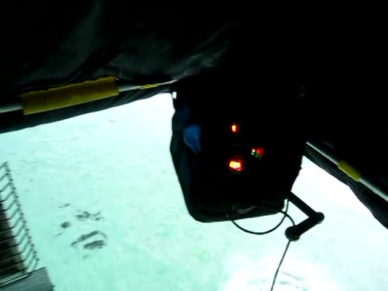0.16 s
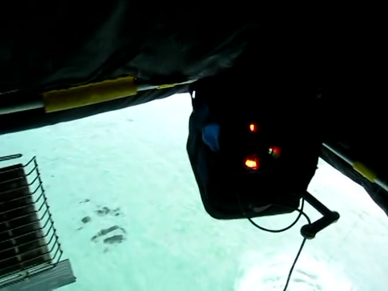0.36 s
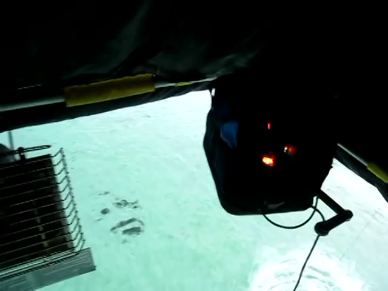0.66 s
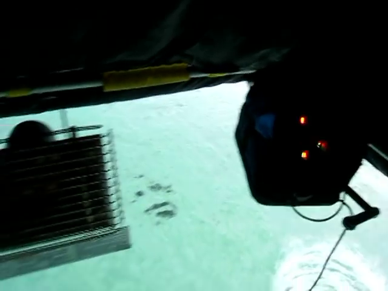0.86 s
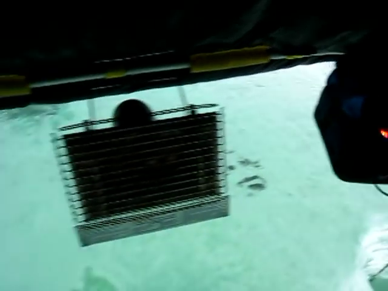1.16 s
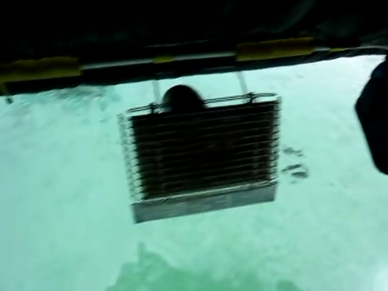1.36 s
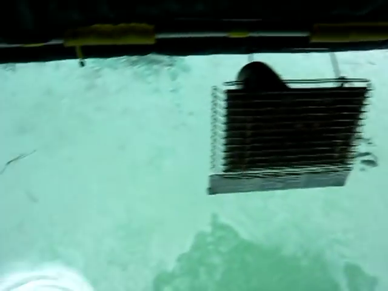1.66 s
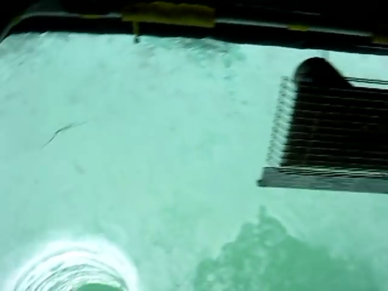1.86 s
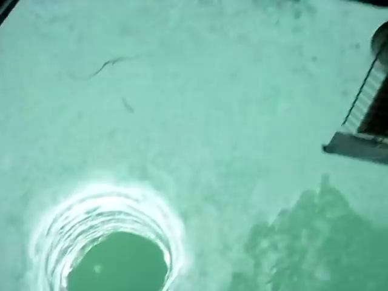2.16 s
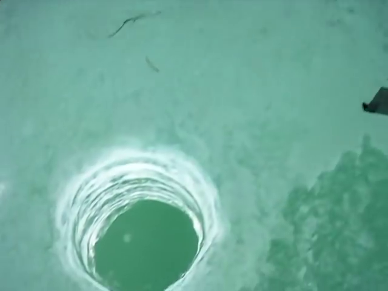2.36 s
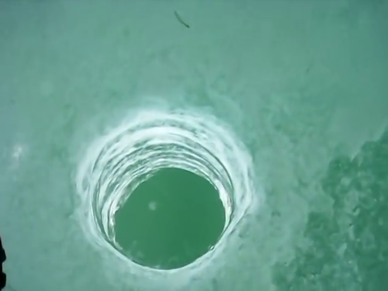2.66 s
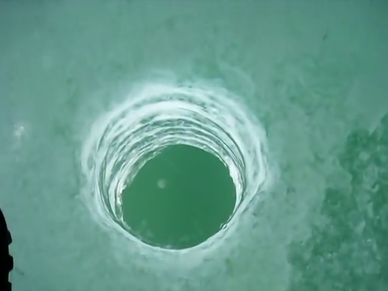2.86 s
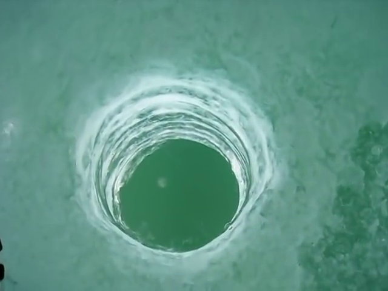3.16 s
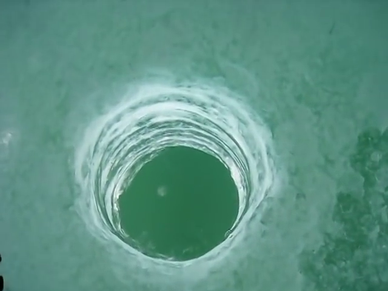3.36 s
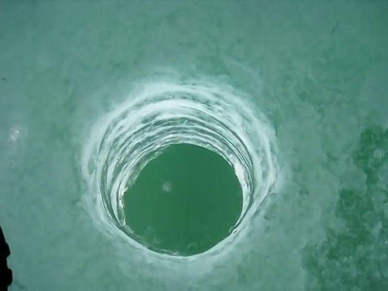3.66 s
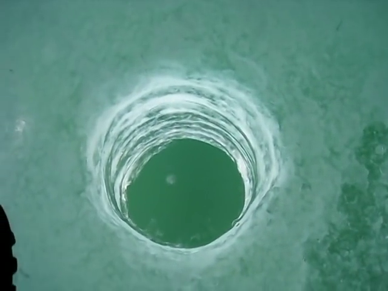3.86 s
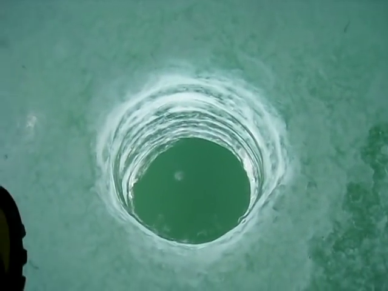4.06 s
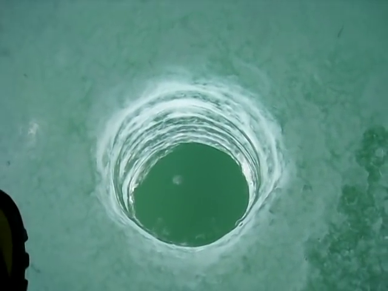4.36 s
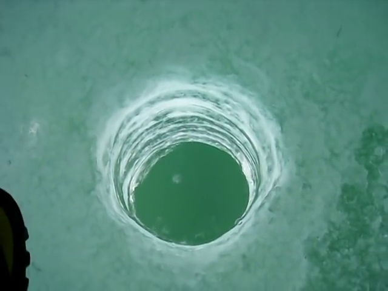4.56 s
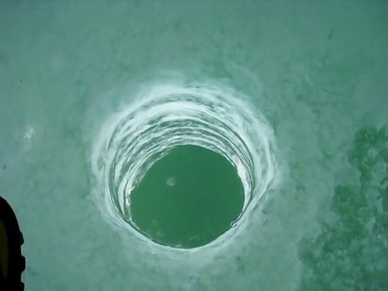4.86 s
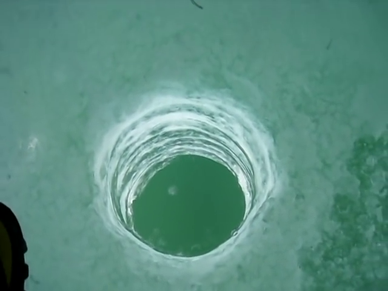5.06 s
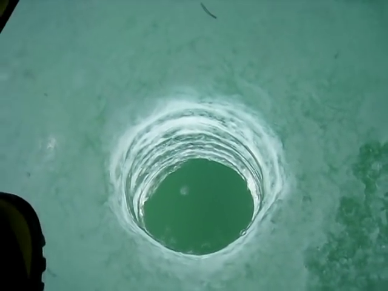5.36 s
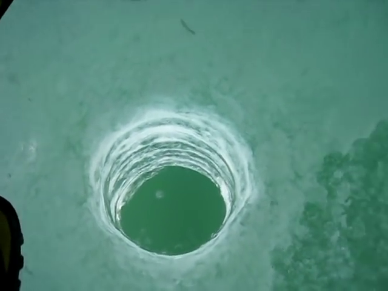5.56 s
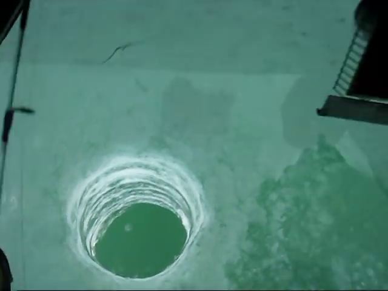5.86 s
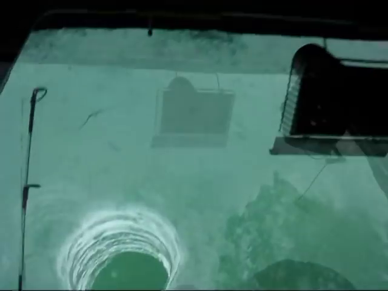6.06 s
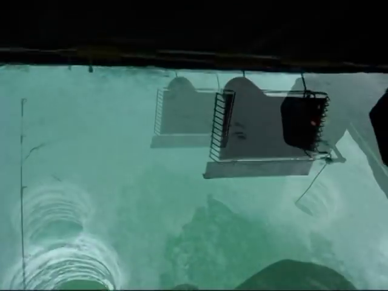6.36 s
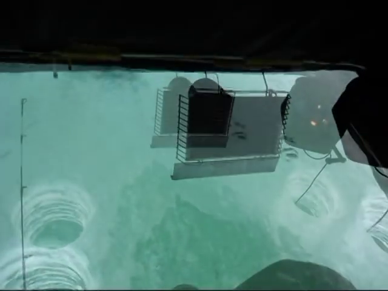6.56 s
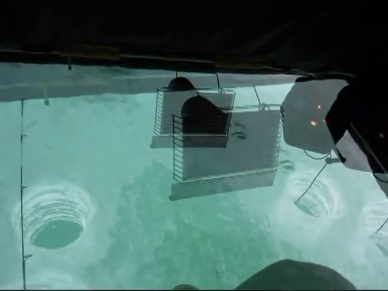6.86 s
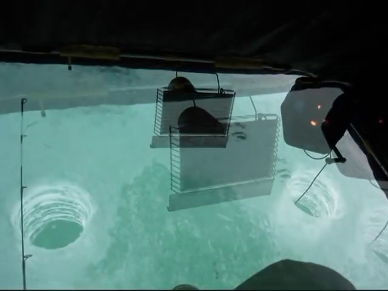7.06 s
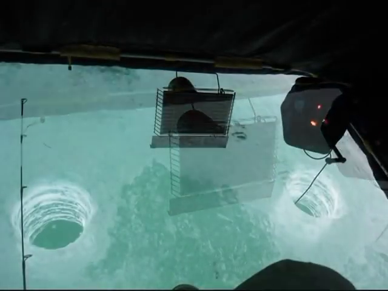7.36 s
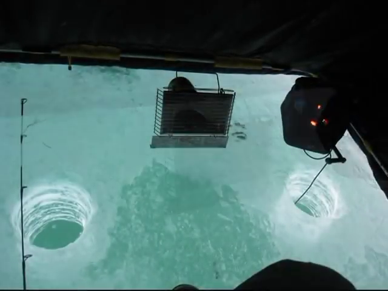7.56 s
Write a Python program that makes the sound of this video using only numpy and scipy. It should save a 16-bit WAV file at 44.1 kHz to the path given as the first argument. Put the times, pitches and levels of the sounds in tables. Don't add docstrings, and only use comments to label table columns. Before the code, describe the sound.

A propane heater hisses steadily with a thin high whistle inside a small tent, while sleeves rub close by and gear clicks, then smacks loudly once.

```python
import sys
import numpy as np
from scipy import signal
from scipy.fft import rfft, irfft, next_fast_len
from scipy.io import wavfile
from scipy.ndimage import uniform_filter1d, map_coordinates

SR = 44100
rng = np.random.default_rng(int(sys.argv[2]) if len(sys.argv) > 2 else 0)


def elevation(decibels):
    levels = np.asarray(decibels, float)
    return 10 ** (levels / 20)


def waveform_to_disk(signal):
    frames = np.transpose(np.atleast_2d(signal))
    scaled = np.clip(frames, -1, 1) * 32767
    samples = np.round(scaled).astype(np.int16)
    wavfile.write(sys.argv[1], SR, samples)


N = 340011


def unit(x):
    return x / np.sqrt(np.mean(x ** 2) + 1e-20)


def along(points, hz):
    f, v = np.transpose(points)
    return np.interp(np.log(hz + 1), np.log(f + 1), v, left=v[0] - 60, right=v[-1] - 60)


def curves(rows):
    s, *cols = np.transpose(rows)
    return [np.interp(np.arange(N) / SR, s, c) for c in cols]


def wobble(rate):
    step = np.arange(0, N + 16, 16)
    knots = rng.standard_normal(int(N * rate / SR) + 4)
    return np.interp(np.arange(N), step, map_coordinates(knots, [step * rate / SR]))


def patchy(depth_db):
    z = signal.stft(rng.standard_normal(N), nperseg=512)[2]
    field = uniform_filter1d(rng.standard_normal(z.shape), size=6, axis=0)
    field = uniform_filter1d(field, size=12, axis=1)
    return signal.istft(z * elevation(depth_db * unit(field)), nperseg=512)[1][:N]


def coloured(x, spectrum):
    m = next_fast_len(N + 8192)
    response = elevation(along(spectrum, np.fft.rfftfreq(m, 1 / SR)))
    return unit(irfft(rfft(x, m) * response, m)[:N])


def narrow(hz, width_hz):
    hz = np.full(N, hz) if np.isscalar(hz) else hz
    keep = np.exp(-1.55 * np.pi * width_hz / SR)
    whole_seconds = -(-len(hz) // SR) * SR
    noise = rng.standard_normal((2, whole_seconds))[:, :len(hz)]
    slow = signal.lfilter([1], [1, -2 * keep, keep ** 2], noise)
    turn = 2 * np.pi * np.cumsum(hz) / SR
    return unit(slow[0] * np.cos(turn) + slow[1] * np.sin(turn)) * np.sqrt(2)


def shelter(x):
    # hz, t60_s
    decay = [(300, 0.08), (2000, 0.21), (10000, 0.24)]
    hz, t, z = signal.stft(rng.standard_normal(SR // 4), SR, nperseg=256)
    f, t60 = np.transpose(decay)
    fall = elevation(-60 * t / np.interp(hz, f, t60)[:, None])
    tail = signal.istft(z * fall, SR, nperseg=256)[1]
    return signal.fftconvolve(np.pad(x, (220, 0)), tail / np.linalg.norm(tail))[:N]


def drifting_walls(x):
    hop = round(0.7 * SR)
    out, x = np.zeros(N + 6 * hop), np.pad(x, (hop, 2 * hop))
    window = np.sin(np.pi * np.arange(2 * hop) / (2 * hop))
    for a in range(0, N + hop, hop):
        tail = shelter(window * x[a:a + 2 * hop])
        out[a:a + len(tail)] += tail
    return out[hop:hop + N]


def flame():
    # time_s, rumble_db, throat_tone_db, low_tone_db
    burn = [
        (0, -55, -65.5, -64),
        (.9, -54, -61.5, -70),
        (1.2, -54, -69, -63.5),
        (1.8, -54, -71, -64),
        (3, -55, -73, -63.5),
        (4.2, -53, -73, -66.5),
        (5.7, -54.5, -73, -67),
        (6.5, -55, -71, -65.5),
        (7.3, -57, -68, -61),
        (7.71, -56, -70, -59.5),
    ]
    # hz, db_per_hz
    rumble_spectrum = [(21, -43.5), (36, -10), (49, -5.5), (75, -2.5), (97, 2), (166, -0.5), (199, -9),
                       (222, -6.5), (320, -12.5), (420, -47.5), (700, -120)]
    # hz, db_per_hz
    roar_spectrum = [(180, -43), (260, -3.5), (400, -2), (550, 4.5), (800, 0), (1300, 0.5), (2500, -28.5),
                     (4000, -19)]
    # hz, width_hz, over_rumble_db
    hum = [(109.8, 10, -10), (89.8, 9.7, -10.5)]
    rumble_db, throat_db, low_db = curves(burn)
    rumble = coloured(patchy(depth_db=0.7), rumble_spectrum)
    rumble = rumble + sum(elevation(db) * narrow(hz, width) for hz, width, db in hum)
    roar = coloured(patchy(depth_db=1), roar_spectrum)
    throat = elevation(throat_db) * narrow(399, width_hz=120)
    low = elevation(low_db) * narrow(195.5, width_hz=17)
    roar_db = -54 + 0.99 * wobble(3.04)
    return elevation(rumble_db + .6 * wobble(6.4)) * rumble + throat + low + elevation(roar_db) * roar


def cloth():
    # middle_s, length_s, rub_db, swish_over_rub_db
    strokes = [(0.086, 0.038, -57, 3.5), (0.226, 0.102, -45.5, 5), (0.268, 0.033, -35, -11),
               (0.317, 0.034, -33, -6), (.342, 0.018, -33.5, -6), (.367, .018, -34, -5),
               (0.393, .022, -35, -5), (.66, 0.059, -41.5, -6.5), (.72, 0.063, -42, 1.5),
               (0.798, 0.14, -43, -6), (.8, 2.3, -47, -7), (0.905, 0.1, -40.5, 2.5), (1.164, 0.059, -39, 0),
               (1.26, 0.15, -41, -10), (1.43, 0.15, -41.5, -13), (1.96, 0.24, -48.5, 1),
               (2.186, 0.16, -44, -6), (2.45, 0.42, -51.5, 5), (2.885, 0.07, -38.5, 2), (2.951, .1, -38, 2),
               (3.037, 0.12, -37.5, 6), (3.15, 0.18, -37.5, 6), (3.284, 0.25, -37.5, 6),
               (3.43, 0.16, -42, 4), (3.626, 0.27, -41, 4.5), (3.77, 0.21, -40.5, 3), (3.87, .12, -49, 0),
               (4.39, .1, -46, -17), (4.8, 0.16, -44, -5), (5.632, 0.2, -41, -4.5),
               (5.784, 0.17, -38.5, -4), (5.947, 0.25, -32.5, -3.5), (6.116, 0.25, -41.5, 1.5),
               (6.302, 0.27, -40, -1), (6.469, 0.17, -36, -3.5), (7.206, 0.18, -41.5, 0.5)]
    # hz, db_per_hz
    rub_spectrum = [(300, -35.5), (550, -21.5), (800, -5), (1050, -4.5), (2000, -0.5), (3000, -2.5),
                    (4500, -3), (7000, -18)]
    # hz, db_per_hz
    swish_spectrum = [(2500, -18.5), (4000, -8), (6000, -4), (8500, -3), (11000, -3), (13500, -9.5),
                      (15700, -16.5), (16500, -39)]
    # hz, db_per_hz
    thrum_spectrum = [(200, -23), (300, -5.5), (450, -1.5), (900, -2.5), (2000, -3), (2500, -16),
                      (3500, -39)]
    square = 1.68
    rest_rub_db, rest_swish_db = -50, -49
    t = np.arange(0, N + 64, 64) / SR
    middle, length, rub_db, swish_db = np.transpose(strokes)[:, :, None]
    power = elevation(2 * rub_db - 8.7 * np.minimum(abs(2 * (t - middle) / length), 9) ** square)

    def gain(over_rub_db, rest_db):
        total = (power * elevation(2 * over_rub_db)).sum(axis=0) + elevation(2 * rest_db)
        return np.interp(np.arange(N) / SR, t, np.sqrt(total))

    def grains(rough_db):
        return patchy(depth_db=1.5) * elevation(rough_db * wobble(500) + wobble(25))

    rub = coloured(grains(rough_db=1.5), rub_spectrum)
    swish = coloured(grains(rough_db=1.0), swish_spectrum)
    thrum = coloured(rng.standard_normal(N) * elevation(2.5 * wobble(120)), thrum_spectrum)
    moving = gain(-12.5 - 0.53 * swish_db, -90) * thrum
    moving = moving + gain(0.1 * swish_db, rest_rub_db) * rub
    return moving + elevation(5.0) * gain(swish_db, rest_swish_db) * swish


def blows():
    # start_s, peak_db, pitch_hz, after_ring_db
    thuds = [
        (4.35, -28, 640, -11),
        (4.353, -35, 373, -12),
        (5.6155, -24, 479, -24),
        (5.68, -32, 230, -20),
        (5.268, -26, 720, -20),
        (5.83, -26, 710, -15),
        (5.889, -24.5, 523, -22),
        (6.035, -29, 690, -26),
    ]
    clicks = [(0.361, -23, 1300, -12), (0.366, -22, 2050, -4), (0.403, -22, 1800, -18),
              (3.7584, -23, 1100, -10), (4.7411, -27, 1270, -17), (0.249, -18.5, 1140, -15),
              (5.2655, -18, 1400, -19.5), (5.2658, -19, 3000, -20), (5.2658, -20, 4600, -19.5),
              (5.2792, -21, 2000, -8), (5.279, -13, 5000, -22), (5.886, -12.5, 1620, -19),
              (6.0353, -12, 1300, -22), (6.479, -19.5, 1348, -30), (6.4925, -24, 795, -22)]
    pops = [(0.2593, -22, 1590, -20), (0.2615, -20, 2200, -20), (0.3132, -24, 2060, -12),
            (0.317, -24, 2100, -19), (0.393, -24, 1930, -12), (0.3394, -25, 1610, -6),
            (0.382, -22, 1300, -9), (0.6963, -20, 2060, -20), (1.3673, -26.5, 1050, -10),
            (3.753, -13, 3420, -13), (5.0469, -37.5, 1576, -10), (6.4842, -13, 2044, -18)]
    ticks = [
        (0.6961, -31.5, 2010, 7),
        (1.8081, -33.5, 2450, -3.5),
        (2.2184, -35, 1900, -9),
        (4.277, -28, 2000, -2),
        (4.2795, -25, 1800, -4),
        (4.478, -32, 2050, 0),
        (6.7316, -23, 2430, -10),
        (7.4175, -17.5, 2170, -10),
    ]
    tocks = [
        (4.2807, -36, 1414, 2),
        (4.349, -32, 810, -15),
        (4.349, -35, 1510, -12),
        (4.481, -36, 1300, -3),
        (6.7322, -25, 1313, -21),
        (7.4192, -19, 1390, -33),
    ]
    knocks = [(0.357, -38.5, 297, -21), (0.361, -30, 877, -14), (1.245, -33, 853, -12),
              (1.389, -40, 611, -4), (3.239, -40, 500, 0), (4.365, -40, 175.7, -10),
              (5.2785, -17.5, 720, -14), (5.291, -33, 642, -14), (5.68, -43, 89.4, -9.5),
              (5.681, -27, 690, -6), (5.8, -40, 697, 2)]
    pings = [(1.9155, -21, 1960, -8), (1.917, -27, 3950, -9), (1.918, -30, 3350, -3), (1.92, -33, 2400, -1),
             (1.917, -33, 1680, -12), (1.932, -31, 1950, -12), (1.981, -37, 1930, -6),
             (1.988, -37, 1930, -9), (5.278, -28, 2100, -5), (5.281, -31, 2750, -5), (5.291, -34, 2550, -5),
             (5.288, -35, 2150, -5), (4.2755, -27, 1800, -5), (4.279, -31, 2250, -1),
             (4.278, -32, 3450, -4), (4.477, -32, 1800, -3), (4.48, -33, 2350, -1), (4.483, -34, 3400, -4)]
    smacks = [
        (5.6765, -20, 3300, -14),
        (5.6852, 1.5, 2020, -33),
        (5.6858, -15, 5600, -20),
        (5.6858, -19, 4300, -20),
        (5.6872, -21, 1150, -14),
        (5.6895, -19, 2480, -10),
        (5.6915, -20, 2550, -15),
    ]
    # blow_cycles, crack_db, ring_t60_s, noise_in_ring, fall_s
    click = (2.2, -7, 0.06, 1, .0005)
    thud = (2.5, -31, 0.2, 0.2, .0009)
    ping = (23, -18, .07, .35, 0)
    smack = (3.8, -12, .14, 1, .0004)
    pop, tick = (3.5, -7.5, 0.1, 0.75, .0009), (8, -13, 0.06, 1.1, .0004)
    tock, knock = (5, -27, .045, 2, .0006), (6, -33.5, 0.09, 0.4, .0002)
    kinds = [(thuds, thud), (clicks, click), (pops, pop), (ticks, tick),
             (tocks, tock), (knocks, knock), (pings, ping), (smacks, smack)]
    out, t = np.zeros(N + SR), np.arange(SR // 12) / SR
    bright = signal.butter(2, [2600, 7000], "band", fs=SR, output="sos")
    modes = [(1, 0.8), (1.25, .35), (1.85, 0.3)]
    events = [(row, kind) for rows, kind in kinds for row in rows]
    for (s, db, hz, ring_db), (cycles, crack_db, t60, noisy, fall_s) in events:
        length = cycles / hz
        push = np.sin(np.pi * np.clip(t / length, 0, 1)) ** 2
        fall = 1 + fall_s / length * (1 - t / length)
        blow = push * np.sin(2 * np.pi * hz * t * fall)
        crack = elevation(crack_db - 60 * t / 0.021) * signal.sosfilt(bright, rng.standard_normal(len(t)))
        body = signal.butter(2, [0.84 * hz, 1.27 * hz], "band", fs=SR, output="sos")
        rattle = noisy * unit(signal.sosfilt(body, rng.standard_normal(len(t))))
        rattle = rattle + sum(level * np.sin(2 * np.pi * hz * ratio * t) for ratio, level in modes)
        rattle = rattle * elevation(ring_db - 3.0 - 60 * t / t60)
        onset = 1 - np.exp(-t / 0.001)
        out[round((s + .0003) * SR):][:len(t)] += elevation(db - 3.5) * (blow + (crack + rattle) * onset)
    return out[:N]


def cracks():
    # start_s, peak_db
    events = [(0.2626, -23), (0.3135, -19), (.317, -23), (0.694, -19), (0.6985, -20), (1.918, -29),
              (.3405, -23), (.347, -24), (.3695, -23), (.3885, -24), (.396, -24), (3.7492, -17.5),
              (4.278, -30), (4.479, -30.5), (5.2649, -27), (5.279, -19.5), (5.885, -27.5), (6.035, -24),
              (6.4835, -23), (6.725, -30), (6.732, -27), (7.418, -26.5)]
    out, t = np.zeros(N + SR), np.arange(SR // 12) / SR
    broad = signal.butter(2, [900, 6500], "band", fs=SR, output="sos")
    for s, db in events:
        noise = signal.sosfilt(broad, rng.standard_normal(len(t)))
        out[round(s * SR):][:len(t)] += elevation(db + 2.0 - 60 * t / 0.025) * noise
    return out[:N]


def snaps():
    # start_s, peak_db, centre_hz
    events = [
        (0.0712, -21, 11200),
        (0.3117, -16, 10200),
        (1.1686, -21, 9630),
        (3.7515, -2, 9330),
        (3.7564, -12, 9170),
        (5.2653, -16, 4500),
        (5.2788, -15, 5000),
        (6.4845, -4, 12840),
        (6.7314, -13, 11600),
        (7.4177, -13.5, 8930),
    ]
    out, t = np.zeros(N + SR), np.arange(SR // 12) / SR
    sharp = signal.butter(4, 8000, "high", fs=SR, output="sos")
    for s, db, hz in events:
        fading = elevation(db - 60 * t / 0.0046) * (1 - np.exp(-t / 0.00028))
        noise = signal.sosfilt(sharp, rng.standard_normal(len(t)))
        out[round(s * SR):][:len(t)] += fading * (0.97 * noise + 0.52 * np.sin(2 * np.pi * hz * t))
    return out[:N]


def glints():
    # start_s, end_s, first_hz, last_hz, over_tube_db
    paths = [(0, 0.214, 6400, 6350, -20), (0.197, 1.298, 4890, 5200, -10), (.6, .86, 6500, 7600, -10),
             (1.1, 1.501, 6300, 7200, -10), (1.452, 1.723, 7000, 7050, 0), (1.62, 1.93, 5250, 5750, -7),
             (1.89, 2.1, 5750, 5750, -7.5), (1.78, 1.9, 4900, 5000, -13), (1.98, 2.15, 4850, 4950, -11.5),
             (1.75, 1.85, 7300, 7300, -6), (1.74, 1.953, 7600, 6950, -5.5), (1.9, 2.153, 7050, 7300, -0.5),
             (2.13, 2.327, 6800, 6200, -8), (2.128, 2.33, 6350, 6450, -4), (2.28, 2.64, 5700, 5900, -4.5),
             (2.25, 2.6, 4850, 5400, -12), (2.25, 2.5, 6800, 6950, -4.5), (2.5, 3, 5200, 5300, -12),
             (2.456, 2.947, 7700, 6880, -10), (2.618, 2.899, 6100, 5900, -6), (4.5, 4.923, 6520, 6900, -14),
             (3.7, 5.35, 6300, 6800, -5.5), (3.5, 5.6, 4670, 4747, -13.5), (3.898, 5.65, 5393, 5800, -17),
             (4.9, 5.6, 6400, 6200, -3.5), (5.15, 5.45, 6520, 6450, -4.5), (5.56, 5.77, 5800, 6800, -3),
             (5.58, 5.696, 7150, 7220, -1), (5.549, 5.7, 5950, 5800, -6.5), (5.77, 5.92, 6090, 6260, -2),
             (6.5, 7.712, 5700, 5720, -14), (6.103, 6.4, 6900, 6900, -2), (6.45, 7.249, 6960, 6800, -0.5),
             (6.495, 7.105, 7350, 7250, -4), (6.6, 7.0, 6450, 6550, -14), (7.08, 7.711, 7280, 7300, -1),
             (7.28, 7.71, 6900, 7000, -0.5), (7.005, 7.71, 6300, 6400, -6)]
    out, flicker = np.zeros(N), wobble(6)
    for start, end, first_hz, last_hz, db in paths:
        a, b = round(max(start, 0) * SR), min(round(end * SR), N)
        swell = np.sin(np.linspace(0, np.pi, b - a)).clip(0) ** 0.42
        level = elevation(db - 5.5 + 1.4 * np.roll(flicker, rng.integers(N))[a:b])
        out[a:b] += level * swell * narrow(np.linspace(first_hz, last_hz, b - a), width_hz=125)
    return out


def jet():
    # time_s, hiss_db, whistle_over_hiss_db, whistle_hz
    heater = [(0.0, -37, 1, 7012), (0.41, -34.5, -4, 7190), (0.6, -36.5, -5, 7167), (0.97, -34.5, 1, 7110),
              (1.29, -36.5, -2, 7150), (1.63, -35.5, -6, 7220), (2.1, -33.5, -2, 7190),
              (2.38, -31, -9, 6950), (2.94, -31.5, 3.5, 7100), (3.61, -31, 5, 7114), (3.95, -32, 1, 7195),
              (4.6, -33.5, 3, 7166), (4.94, -34, 6.5, 7190), (5.33, -32.5, -6, 7150),
              (5.8, -31.5, -8.5, 7110), (6.18, -33.5, 3.5, 7245), (6.55, -34, -2.5, 7090),
              (7.71, -34, -7, 7070)]
    # time_s, share_turned_to_ice (0-1)
    heading = [
        (0, 0.3),
        (1.9, 0.15),
        (2.3, 0.75),
        (5.4, 0.66),
        (5.8, 0.5),
        (7.71, 0.03),
    ]
    # hz, db_per_hz
    tube_spectrum = [(1760, -73), (3000, -24), (4250, -20), (4640, -6.5), (5060, -14.5), (5400, -8),
                     (5870, -6.5), (7050, 0), (7390, -3), (7770, -13.5), (9000, -44), (11700, -62),
                     (19800, -120)]
    # hz, db_per_hz
    facing_spectrum = [(1760, -40.5), (3000, -19.5), (4250, -8), (4600, -4.5), (4950, -1.5), (6060, 0),
                       (7150, 4), (8210, -7.5), (9000, -28), (11700, -55.5), (19800, -120)]
    # hz, db_per_hz
    air_spectrum = [(7500, -38), (9000, -17.5), (10500, 6), (12000, 9), (13300, 8), (14200, -3.5),
                    (15700, -6), (16500, -46)]
    # hz, width_hz, over_tube_db
    grille = [(3773, 45, -23.5), (4055, 50, -23.5), (4560, 60, -21)]
    tube_db, whistle_db, whistle_hz = curves(heater)
    turn = np.clip(curves(heading)[0], 0, 1)
    flutter = 0.45 * wobble(6.6) + 0.36 * wobble(20)
    whistle_level = elevation(whistle_db - 3.0 + 0.83 * wobble(7.2) + 0.83 * wobble(40))
    whistle = narrow(whistle_hz, width_hz=167) * whistle_level
    hiss = coloured(patchy(depth_db=0.0), tube_spectrum)
    late = np.arange(N) - SR * (.00145 + .00002 * wobble(0.58))
    combed = unit(hiss + 0.33 * map_coordinates(hiss, [late]))
    direct = coloured(patchy(depth_db=2.5), facing_spectrum)
    tube = np.sqrt(turn) * combed + np.sqrt(1 - turn) * direct
    guard = sum(elevation(db) * narrow(hz, width) for hz, width, db in grille)
    tube = tube + (1 - 0.51 * turn) * guard + glints()
    air_db = -7 + 0.23 * whistle_db + 0.97 * wobble(5.5) + 0.6 * wobble(15)
    air = elevation(air_db) * coloured(patchy(depth_db=1.0), air_spectrum)
    return elevation(tube_db + flutter) * (whistle + elevation(2.5) * tube + air)


def scene():
    contacts, gas = blows() + cracks() + snaps(), jet()
    walled = elevation(-0.98) * (gas + elevation(-7) * drifting_walls(gas))
    fade_from_s, fade_to_s = 5.83, 7.715
    fade = np.clip((fade_to_s - np.arange(N) / SR) / (fade_to_s - fade_from_s), 0, 1)
    mix = walled + flame() + cloth() + contacts + elevation(-13.5) * shelter(contacts)
    return np.tile(fade * mix, (2, 1))


def starved(x):
    # middle_s, length_s, low_hz, high_hz
    gaps = [(.682, .005, 6400, 7900), (1.968, .005, 5500, 6500), (1.977, .004, 6500, 7800),
            (1.745, .004, 6400, 7600), (1.912, .004, 6400, 7600), (1.94, .004, 6800, 7700),
            (2.141, .005, 6400, 7900), (2.922, .005, 6400, 7900), (3.028, .005, 8500, 11500),
            (3.149, .006, 5500, 8000), (3.442, .004, 6400, 7900), (3.456, .004, 6400, 7900),
            (3.47, .004, 6400, 7900), (3.829, .005, 6400, 7900), (4.031, .006, 6000, 7900),
            (4.12, .004, 6600, 7700), (4.225, .005, 6600, 7700), (5.259, .005, 6400, 7900),
            (5.691, .006, 8000, 15700), (6.4795, .005, 11500, 15700), (6.4905, .006, 8000, 10500),
            (6.4905, .006, 12000, 15700), (6.531, .003, 6000, 8500), (6.728, .006, 10000, 15700),
            (7.4145, .004, 8500, 13000), (7.4245, .006, 8000, 10500)]
    hz, t, z = signal.stft(x, SR, nperseg=256, noverlap=192)
    cells = rng.random((17, len(t) // 4 + 1)) < .022
    lost = np.kron(cells, np.ones((8, 4)))[:len(hz), :len(t)]
    lost = lost * (np.arange(len(t)) % 4 > 0) * (hz > 7900)[:, None]
    for s, length, low_hz, high_hz in gaps:
        lost[np.ix_((hz > low_hz) & (hz < high_hz), abs(t - s) < length / 2)] = 1
    gap_db = -18
    return signal.istft(z * elevation(gap_db * lost), SR, nperseg=256, noverlap=192)[1][:N]


def split_noise(x):
    # low_hz, high_hz, share_of_frames, noise_db
    bands = [(2300, 2900, .05, -12), (2900, 3700, .05, -12), (5200, 6200, .14, -7), (6900, 8300, .015, -1),
             (8300, 9700, .02, 0), (9700, 11200, .02, 0), (11200, 13000, .02, -2), (13000, 15700, .01, -3)]
    hz, t, z = signal.stft(x, SR, nperseg=2048)
    apart = np.zeros(z.shape)
    for low_hz, high_hz, share, db in bands:
        inside = ((hz > low_hz) & (hz < high_hz))[:, None]
        apart += elevation(db) * inside * (rng.random(len(t)) < share)
    phase = np.exp(2j * np.pi * rng.random(z.shape))
    return signal.istft(apart * abs(z) * phase, SR, nperseg=2048)[1][:N]


def top_cut(x):
    return signal.sosfilt(signal.butter(12, 16030, fs=SR, output="sos"), x)


def record(dry):
    mono = starved(dry[0])
    noise = split_noise(mono)
    t, cut_s, top_hz = np.arange(N) / SR, 7.659, 15800
    closing = np.clip((cut_s - t) / 0.003, 0.002 * (t < cut_s + .008), 1)
    both = np.array([mono + noise, mono - noise]) * closing
    m = next_fast_len(N)
    low_pass = np.clip((top_hz - np.fft.rfftfreq(m, 1 / SR)) / 150, 0, 1)
    both = irfft(rfft(both, m) * low_pass, m)[:, :N]
    return top_cut(both)


dry = scene()
out = record(dry)
waveform_to_disk(out)
```